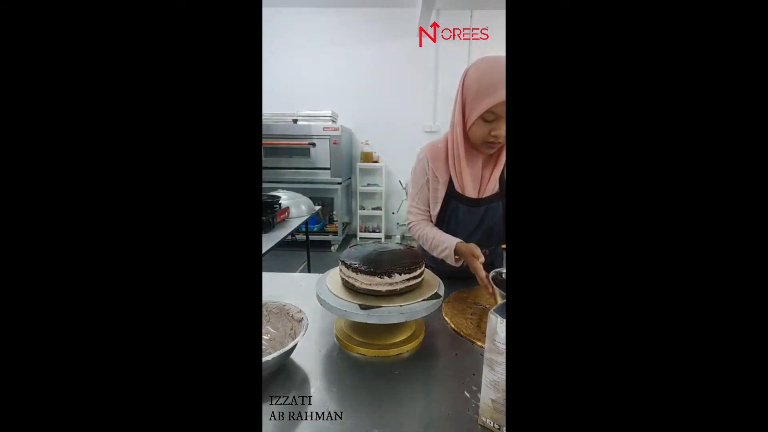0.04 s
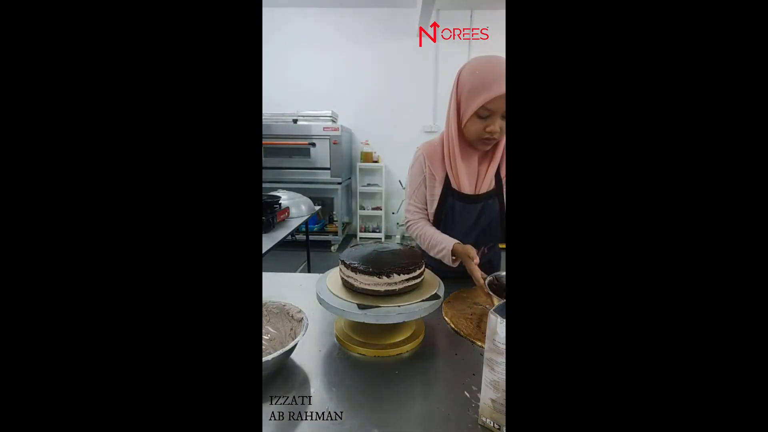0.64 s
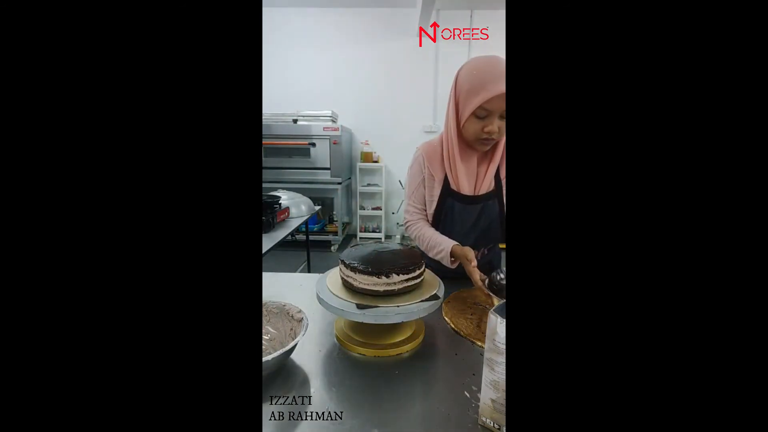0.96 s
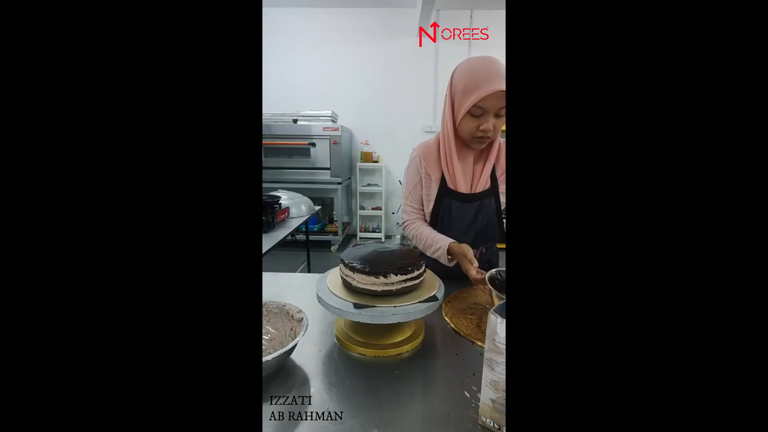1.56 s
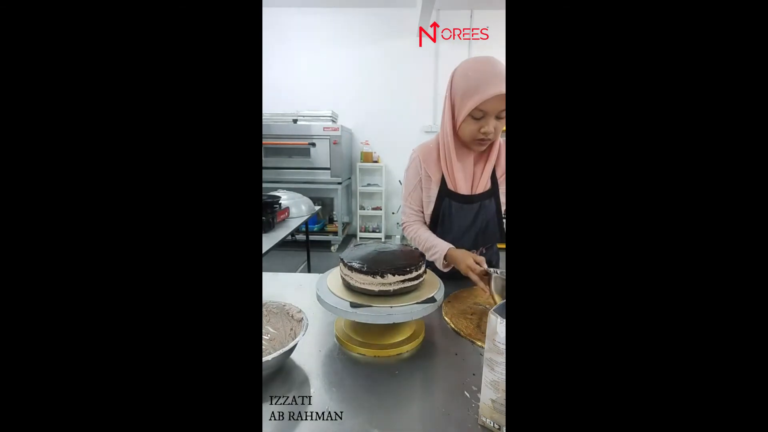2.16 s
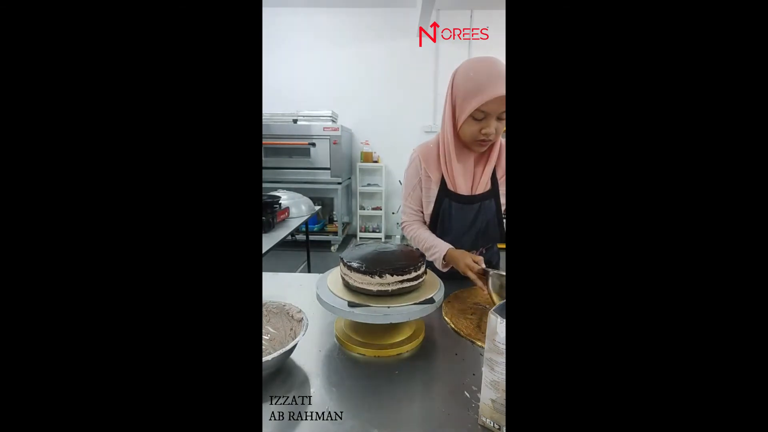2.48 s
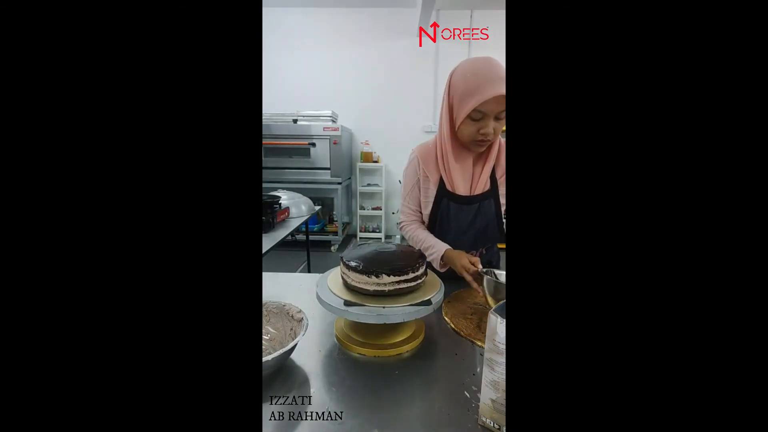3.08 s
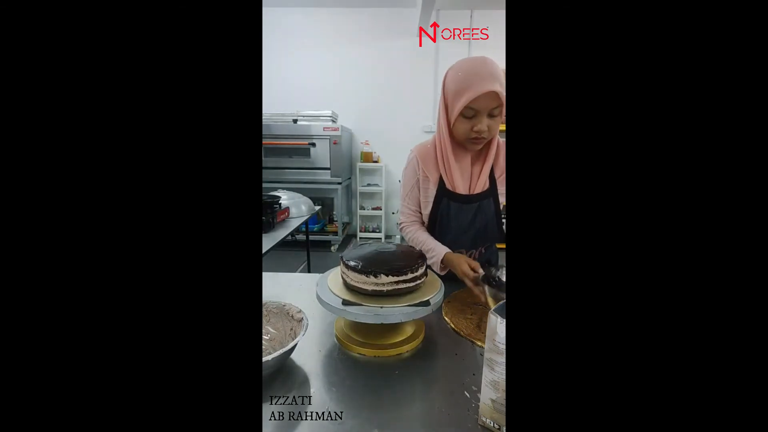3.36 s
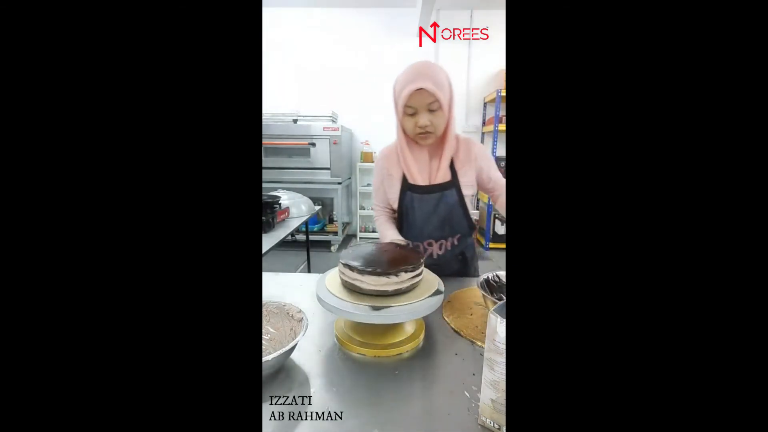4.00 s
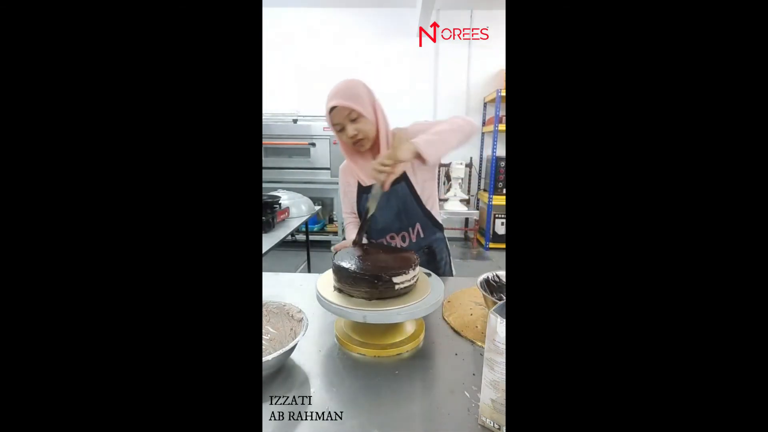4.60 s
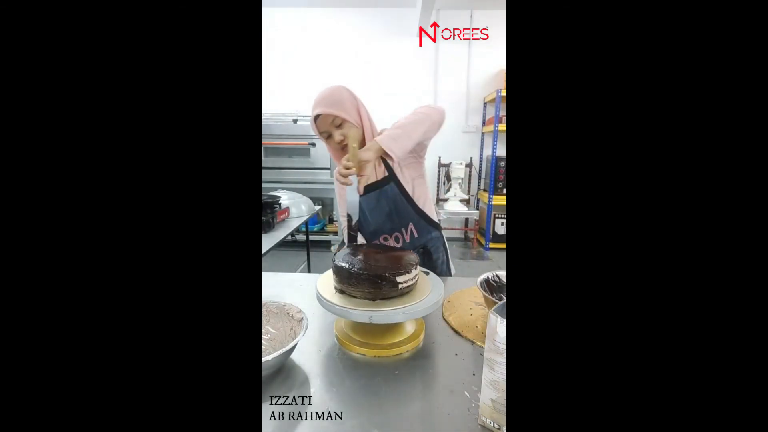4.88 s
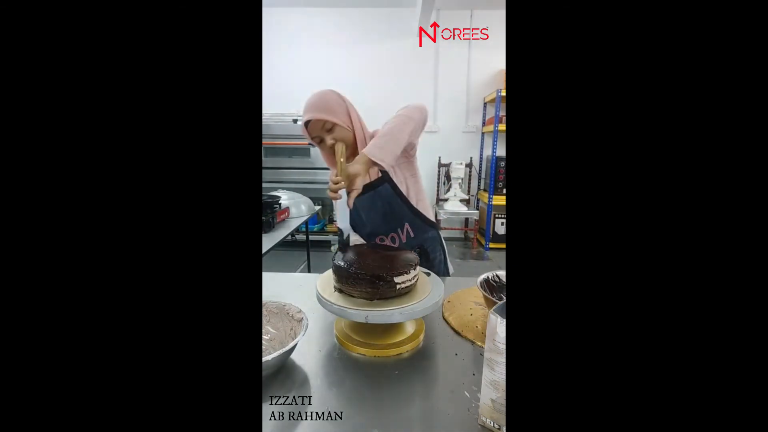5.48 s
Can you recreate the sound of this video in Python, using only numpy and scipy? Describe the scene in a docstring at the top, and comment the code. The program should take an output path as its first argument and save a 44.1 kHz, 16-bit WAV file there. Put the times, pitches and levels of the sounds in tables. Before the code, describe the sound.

Irregular metal taps, dull bowl knocks and soft scrapes ring through a humming kitchen, followed by one booming thump on a counter.

```python
"""Kitchen machines hum and rush, and a soft hiss swells into the first tap of a metal utensil.
It clinks on steel bowls, waking the modes of their thin metal, knocks dully on a filled one
and scrapes softly between the taps. Something is put down with a thump that makes the counter boom,
and faint rubs at a cake stand follow. The hard-walled room rings long after every blow."""
import sys
import numpy as np
from scipy import signal
from scipy.fft import rfft, irfft
from scipy.io import wavfile
from scipy.ndimage import uniform_filter1d

SR = 44100
rng = np.random.default_rng(int(sys.argv[2]) if len(sys.argv) > 2 else 0)


def transcribe(signal):
    """Save signal, clipped to [-1, 1], as a 16-bit WAV file at the path in sys.argv[1]."""
    frames = np.atleast_2d(signal).T
    limited = np.clip(frames, -1, 1)
    pcm = np.round(limited * 32767).astype(np.int16)
    wavfile.write(sys.argv[1], SR, pcm)


N = 249165
HZ = np.fft.rfftfreq(8192, 1 / SR)  # frequency grid for every body's response


def amp(db):
    """Decibels to gain."""
    return 10 ** (np.asarray(db) / 20)


def unit_rms(x):
    """Scales to an rms of one."""
    return x / np.sqrt(np.mean(x ** 2) + 1e-20)


def curve(points, hz):
    """Reads a breakpoint curve on a log-frequency axis."""
    f, value = np.transpose(points)
    return np.interp(np.log(hz + 1), np.log(f + 1), value)


def add(mix, s, sound):
    """Mixes a stereo sound in at time s."""
    part = mix[:, round(s * SR):][:, :sound.shape[1]]
    part += sound[:, :part.shape[1]]


def impulse(gain):
    """The minimum-phase impulse response of a body with this gain at HZ."""
    cepstrum = irfft(np.log(np.maximum(gain, 1e-5)))
    half = len(cepstrum) // 2
    folded = np.r_[cepstrum[0], 2 * cepstrum[1:half], np.zeros(half)]
    return irfft(np.exp(rfft(folded)))[:half]


def filtered(track, gain):
    """Plays a stereo track through a body with this gain at HZ."""
    return signal.oaconvolve(track, impulse(gain)[None], axes=1)[:, :N]


def bell(hz, width):
    """One resonance as a bell curve of height one."""
    return 1 / (1 + (2 * (HZ - hz) / width) ** 2)


def mode_eq(modes):
    """The boosts and cuts of a set of bell curves, in dB."""
    return sum(db * bell(hz, width) for hz, width, db in modes)


def steel_ripple(depth_db, smooth_bins):
    """Each spot wakes its own mix of sheet steel's close modes (dB); fewer bins ring longer."""
    noise = rng.standard_normal(len(HZ))
    close = uniform_filter1d(uniform_filter1d(noise, smooth_bins), smooth_bins)
    ripple = unit_rms(close - uniform_filter1d(close, 4 * smooth_bins))
    return depth_db * (ripple - np.maximum(ripple - .6, 0) / 2 - .23)  # deep gaps, rounded tops


# stereo image of the room: f/Hz, left-right correlation
CORRELATION = [(50, 0.8), (130, 0.99), (250, 0.83), (500, 0.59), (1000, 0), (2000, 0.044), (15000, 0)]


def diffuse(size, spectrum=None):
    """Noise from all around: nearly mono in the bass, wide in the treble."""
    hz = np.fft.rfftfreq(size, 1 / SR)
    left, unrelated = np.exp(2j * np.pi * rng.random((2, len(hz))))
    alike = np.clip(curve(CORRELATION, hz), -1, 1)
    right = alike * left + np.sqrt(1 - alike ** 2) * unrelated
    gain = amp(curve(spectrum, hz)) if spectrum else 1
    return unit_rms(irfft(np.array([left, right]) * gain, size))


# spectrum of the fans: f/Hz, relative level/dB
FAN_RUSH = [(25, -18), (75, -15), (100, -9), (130, -7), (190, 0), (270, -9), (350, -4.5), (490, -11),
            (800, -10.5), (1600, -19), (2700, -26), (5000, -41), (8000, -40), (15000, -35.5)]
# tones of the motors: f/Hz, level/dB
MOTOR_HUM = [(101, -72), (115, -72.5), (200, -76), (246.5, -65), (345, -67), (432, -77)]


def machines(rush_db=-54, waver_rad=0.41, gust_db=4.5, smooth_above_hz=900):
    """The bed: fans rush unevenly and motors hum with slowly wavering tones."""
    t, knots = np.arange(N) / SR, np.linspace(0, N / SR, num=30)
    hum = 0
    for hz, db in MOTOR_HUM:
        drift = waver_rad * np.interp(t, knots, rng.standard_normal(len(knots)))
        hum += amp(db) * np.sqrt(2) * np.sin(2 * np.pi * hz * t + drift)
    hz, _, bands = signal.stft(diffuse(N, FAN_RUSH), SR, nperseg=2048)
    gusts = uniform_filter1d(rng.standard_normal(bands.shape[1:]), size=7, axis=0)
    gusts = unit_rms(uniform_filter1d(gusts, size=6, axis=1))
    depth_db = gust_db / np.hypot(1, hz / smooth_above_hz)  # the hiss is smoother than the rumble
    rush = unit_rms(signal.istft(bands * amp(depth_db[:, None] * gusts))[1][:, :N])
    return (amp(rush_db) * rush + hum) * amp([[-.7], [.7]])


# soft hiss swelling into the first tap, then scrapes: peak t/s, swell/s, fade/s, level/dB, rasp/dB
SWELLS = [(0.187, 0.09, 0.11, -58.5, 8), (1.04, 0.088, 0.097, -49.5, -10), (1.191, 0.064, 0.067, -53, 3.5),
          (1.946, 0.059, 0.078, -51, 6.5), (3.53, 0.12, 0.069, -54.5, 1.5), (4.2, 0.11, 0.12, -66, -18),
          (5.35, 0.092, 0.39, -75, -3)]
# tone of the scraping hiss, lifted near 9.6 kHz where the rest of the scene is already dulled: f/Hz, relative
# level/dB
SCRAPE_EQ = [(300, -27), (700, 0), (1800, 5.5), (3000, -4), (4500, 3), (6000, 3.5), (7700, 9), (8900, -0.5),
             (9600, 5.5), (11000, -3.5), (15000, -11)]


def scraping(grit=0.37, catches_per_s=260, rasp_below_hz=5500):
    """Gritty hiss swells and fades: a lead-in to the first tap, then light friction along the bowl, and last a
    soft spatula stroke over the cake's icing."""
    t, out = np.arange(N) / SR, np.zeros((2, N))
    catches = unit_rms((rng.random(N) < catches_per_s / SR) * rng.exponential(1, N))
    hiss = rng.standard_normal((2, N)) + grit * catches
    for peak, swell_s, fade_s, db, rasp_db in SWELLS:
        rasp = rasp_db / (1 + (HZ / rasp_below_hz) ** 6)
        colour = curve(SCRAPE_EQ, HZ) + rasp + steel_ripple(depth_db=4.5, smooth_bins=14)
        envelope = np.exp(-abs(t - peak) / np.where(t < peak, swell_s, fade_s))
        out += amp(db) * envelope * unit_rms(filtered(hiss, amp(colour)))
    return out


# reverb decay of the kitchen: f/Hz, t60/s
ROOM_DECAY = [(70, 1), (150, 1), (300, 0.41), (660, 0.7), (1500, 0.49), (3000, 0.64), (5000, 0.48),
              (8000, 0.46), (14000, 0.24)]
# slaps off its walls: delay/s, relative level/dB
WALL_ECHOES = [(.017, -25), (.041, -24), (.049, -14), (.056, -38), (.098, -16), (.17, -14.5), (.245, -18.5)]


def kitchen(blow, direct_db, lag_s, scatter, hold_s, walls_db, build_s=0.0094, scatter_s=0.0065):
    """Direct sound, a spray of echoes off counter and bowls, wall slaps, a tail that holds, then dies."""
    hz, frame_s, bands = signal.stft(diffuse(SR), SR, nperseg=256)
    decay = amp(-60 * (np.hypot(frame_s, hold_s) - hold_s) / curve(ROOM_DECAY, hz)[:, None])
    tail = signal.istft(bands * decay, SR)[1][:, :SR]
    t = np.arange(SR) / SR
    tail = unit_rms(tail * (1 - np.exp(-t / build_s))) / np.sqrt(SR)
    spray = unit_rms(rng.standard_normal((2, SR)) * np.exp(-(t / scatter_s) ** 2)) / np.sqrt(SR)
    direct = np.zeros((2, SR))
    far_side = int(lag_s > 0)  # a positive lag reaches the left first
    direct[1 - far_side, 0] = 1
    direct[far_side, round(abs(lag_s) * SR)] = 1
    for delay, db in WALL_ECHOES:
        add(tail, delay, amp(db + walls_db) * direct)
    # long waves pass the clutter whole, short ones are scattered by it
    straight = signal.lfilter(*signal.butter(1, 3500, fs=SR), direct)
    scattered = signal.lfilter(*signal.butter(1, 3500, "high", fs=SR), spray)
    near = straight + scatter * scattered
    return signal.fftconvolve(blow[None], amp(direct_db) * near + tail, axes=1)


# hits on the filled bowl: t/s, level/dB, pitch factor, clack/dB, direct/dB
KNOCKS = [(0.2135, 7.5, 1.03, -21, -17), (0.61, -2, 0.87, -32, -2), (0.6315, 12, 1, -36, -7.5),
          (0.682, -3.5, 0.93, -10, 8), (0.6942, 0.5, 1.04, -14, 5.5), (1.5144, 20, 1.03, -16.5, 1),
          (2.5052, 17, 0.97, -1.5, 0), (3.1633, 25.5, 1.016, -25.5, 3.5)]
# modes of its damped wall: f/Hz, width/Hz, level/dB
DAMPED_MODES = [(622, 56, 1), (686, 46, 3), (850, 150, -6.5), (1040, 120, -16)]
# clack of hard contact: f/Hz, width/Hz
CLACK_BAND = (1730, 570)


def knock(level_db, pitch, clack_db, direct_db, snap_db=-16):
    """The filling damps the bowl's wall quickly; a brief snap comes straight from the contact point."""
    wall = np.sqrt(sum(amp(db) ** 2 * bell(hz * pitch, width) for hz, width, db in DAMPED_MODES))
    clack_hz, clack_width = CLACK_BAND
    clack = amp(clack_db) / np.hypot(1, (2 * (HZ - clack_hz) / clack_width) ** 2)
    # too small for bass, too soft for treble
    radiated = 1 / np.hypot(1, (500 / (HZ + 1)) ** 6) / np.hypot(1, HZ / 2600)
    blow = amp(level_db) * impulse(np.hypot(wall, clack) * radiated)
    sound = kitchen(blow, direct_db, lag_s=0.00016, scatter=0.15, hold_s=0.18, walls_db=-1,
                    build_s=0.0009)
    snap_hz, snap_width = 1150, 900
    snap_band = 1 / np.hypot(1, (2 * (HZ - snap_hz) / snap_width) ** 2)
    snap = amp(level_db + snap_db) * impulse(radiated * snap_band)
    add(sound, 0, np.array([snap, np.roll(snap, shift=6)]))
    return sound * amp([[.8], [-.8]])


# utensil hits on steel: t/s, level/dB, heft/dB, top treble/dB, direct/dB, scatter gain, part struck
CLINKS = [(0.2136, -1.5, -6, -1, -8.5, 2.3, "rim"), (0.6314, 0, 6, -3, -16, 2.8, "wall"),
          (0.64, -18, 2, -3, 0, 2.2, "wall"), (0.6938, -22, 10.5, 2, 4, 1.1, "wall"),
          (1.287, -27.5, 8, -8, -6, 1.4, "wall"), (1.4494, 0.06, 5.5, 2.5, -9, 1.2, "wall"),
          (2.475, -9.5, 8.5, 6, -7.5, 0.49, "wall"), (2.5058, -1, 8.5, -4, -11.5, 1, "wall"),
          (3.0267, 2.5, 9, -12, -1, 0.61, "base"), (3.8409, 1, 1, 2, -6.5, 0.98, "blade")]
# tone of a light tap: f/Hz, level/dB
TAP_EQ = [(60, -28), (290, -17.5), (400, 0), (650, 0.5), (1000, -5), (1550, 0.5), (2800, -1.5),
          (4700, -4.5), (5600, -3), (6400, -1.5), (7700, 4.5), (8700, -4.5), (11000, -8.5)]
# resonances of the bowl's rim, wall and base and of the utensil's blade: f/Hz, width/Hz, boost/dB
STEEL_MODES = {"rim": [(1103, 170, 16), (1512, 89, 0), (1754, 430, 7.5), (1901, 47, 3), (2270, 110, 3.5),
               (2680, 490, 22.5), (3000, 51, 12.5), (3560, 530, 20.0), (4380, 200, 11.5), (4830, 120, 17.5),
               (5200, 51, -6), (5339, 63, 10), (5450, 41, 5.9), (5740, 110, 8), (5990, 190, 13),
               (6570, 101, 14), (6930, 115, 5), (7300, 50, 4), (7620, 483, 17.5), (8400, 790, 7.5)],
               "wall": [(1092, 150, 8.5), (1296, 73, 9.5), (1790, 85, 6.5), (2050, 78, 5), (2650, 140, 5.5),
               (2960, 22, 12.5), (3570, 42, 6.5), (4270, 250, 7), (5064, 610, 3.1), (5860, 67, 5),
               (6420, 79, 9), (7160, 86, 6), (7470, 410, 4), (8370, 170, 4), (8600, 284, 5)],
               "base": [(333, 29, 4), (1035, 250, 14), (1530, 130, 4), (1991, 43, 5), (2370, 120, 6),
               (2760, 230, 8), (3270, 340, 9), (3760, 493, 7.5), (4440, 43, 11), (4870, 51, 17),
               (5170, 270, 18.5), (5260, 80, 13), (6390, 199, 22), (7200, 650, 7), (8740, 630, 6.5)],
               "blade": [(1140, 49, 6), (1406, 460, 15.5), (1730, 120, 13), (2293, 390, 5.6),
               (2693, 260, 15), (3356, 220, 4.4), (3780, 330, 6.5), (4030, 40, 4.2), (5180, 660, 12),
               (6151, 287, 9.5), (7600, 210, 7), (8160, 580, 8.5), (8600, 71, 10)]}
# deep gaps between each tap's ringing partials, by part: f/Hz, width/Hz, gain/dB
GAPS = {"rim": [(1410, 61, -20), (2580, 79, -22), (2745, 100, -12.5), (3120, 290, -21), (3520, 85, -13),
        (3690, 133, -17.7), (4140, 161, -7), (4620, 244, -16), (7544, 230, -23), (8080, 410, -13.5)],
        "wall": [(1220, 67, -7.0), (1750, 640, -5.5), (2180, 51, -4), (4280, 40, -12), (5520, 330, -2)],
        "base": [(668, 61, -15), (1020, 150, -16.6), (1760, 71, -11.0), (2968, 110, -6), (3320, 120, -17.5),
        (5200, 490, -21), (6430, 320, -15), (7000, 82, -12.2)], "blade": [(1710, 166, -16), (1920, 97, 0),
        (4686, 40, -7.5), (5320, 500, -8.5), (5669, 58, -8)]}
# lightly damped partials, by part: f/Hz, level/dB, t60/s
RING_PARTIALS = {"rim": [(2645, -59, 0.55), (2685, -61, 0.5), (3400, -60, 0.45), (3580, -60, 0.45),
                 (4360, -63, 0.45), (4880, -62, 0.45), (5480, -64, 0.45), (5780, -62, 0.45),
                 (6820, -60, 0.45)], "wall": [(2673, -61, 0.7), (2810, -60, 0.7), (2988, -57, 0.7),
                 (7574, -61, 0.5), (7662, -62, 0.5)], "base": [(2810, -62, 0.55)],
                 "blade": [(2640, -60, 0.85), (2700, -60, 0.85), (7660, -55, 0.55)]}
# how long the reverb holds up, by part: hold/s
REVERB_HOLD = {"rim": 0.19, "wall": 0.2, "base": 0.16, "blade": 0.14}


def clink(level_db, heft_db, top_db, direct_db, scatter, part):
    """Metal on metal: heft drives the low modes, hard contact the top treble; a few partials sing on."""
    low_shelf = 1 / (1 + (HZ / 3720) ** 4)
    top_shelf = 1 - 1 / (1 + (HZ / 10700) ** 20)
    contact = curve(TAP_EQ, HZ) + heft_db * low_shelf + top_db * top_shelf
    modes = mode_eq(STEEL_MODES[part] + GAPS[part]) + steel_ripple(depth_db=2.7, smooth_bins=9)
    blow = impulse(amp(level_db + contact + modes))
    travel_s = 0.000478  # of a 1 kHz bending wave through the steel; higher ones arrive sooner
    dispersion = np.exp(-4j * np.pi * travel_s * np.sqrt(1000 * HZ))
    blow = irfft(rfft(blow, 2 * len(blow)) * dispersion)[:len(blow)]
    sound = kitchen(blow, direct_db, lag_s=-.0001, scatter=scatter, hold_s=REVERB_HOLD[part],
                    walls_db=-19, scatter_s=0.0045)
    t = np.arange(sound.shape[1]) / SR
    ring = sum(amp(db - 60 * t / t60) * np.sin(2 * np.pi * hz * t + rng.uniform(-1.4, 1, (2, 1)))
               for hz, db, t60 in RING_PARTIALS[part])
    return (sound + amp(level_db) * ring) * amp([[-.9], [.9]])


# something put down on the counter: t/s, blow level/dB, direct/dB
THUMP = (4.4634, 9, -6.5)
# tone of the counter: f/Hz, level/dB
COUNTER_EQ = [(25, -33), (50, -23), (75, 1), (118, 6), (150, 4), (250, 4), (450, -5), (760, 0.5),
              (1100, -7.5), (2500, -24), (5000, -29), (8000, -22), (15000, -41)]
# ring of its steel top: f/Hz, width/Hz, gain/dB
COUNTER_RING = [(408, 120, 7.5), (736, 120, 5.5), (940, 51, -7), (1720, 190, 3.5), (2360, 610, 10.5),
                (2990, 91, 11), (3700, 270, 3), (4370, 150, 15), (5000, 170, 10), (5950, 120, 4)]
# its booming low modes: f/Hz, level/dB, t60/s
COUNTER_BOOM = [(68.1, -43, 1.0), (101.5, -36, 0.6), (114.8, -32, 0.6)]


def thump(blow_db, direct_db, attack_s=0.016):
    """The broad counter top booms under a soft blow."""
    t = np.arange(SR) / SR
    boom = sum(amp(db - 60 * t / t60) * np.sin(2 * np.pi * hz * t) for hz, db, t60 in COUNTER_BOOM)
    boom *= 1 - np.exp(-t / attack_s)
    blow = amp(blow_db) * impulse(amp(curve(COUNTER_EQ, HZ) + mode_eq(COUNTER_RING)))
    impact = kitchen(blow, direct_db, lag_s=-.00005, scatter=0.64, hold_s=0.059, walls_db=-20)
    return boom - impact[:, :SR]


# rubs at the cake stand: t/s, level/dB
RUBS = [(5.06, -57), (5.27, -73), (5.62, -60.5)]
# their resonance: f/Hz, width/Hz
RUB_BAND = (870, 250)


def rubbing(fade_s=0.032):
    """Faint, dull rubs as the cake is worked on: noise in one midrange resonance swells and fades."""
    t = np.arange(N) / SR
    rub = unit_rms(filtered(diffuse(N), bell(*RUB_BAND)))
    return rub * sum(amp(db) * np.exp(-((t - s) / fade_s) ** 2) for s, db in RUBS)


def scene():
    """All hits over the bed of machines, scrapes and rubs."""
    mix = machines() + scraping() + rubbing()
    for s, *hit in CLINKS:
        add(mix, s, clink(*hit))
    for s, *hit in KNOCKS:
        add(mix, s, knock(*hit))
    add(mix, THUMP[0], thump(*THUMP[1:]))
    return mix


# response of a small microphone: f/Hz, gain/dB
MIC_EQ = [(20, -1), (8400, -2), (9100, -2.5), (9700, -16), (10300, -18.5), (15500, -16.5)]


def record(dry, hiss_db=-91, cutoff_hz=15550):
    """A small microphone dulls the top treble and adds faint hiss; a steep low-pass ends the band."""
    heard = filtered(dry, amp(curve(MIC_EQ, HZ))) + amp(hiss_db) * rng.standard_normal((2, N))
    low_pass = signal.firwin(511, cutoff_hz, window=("kaiser", 9), fs=SR)
    return signal.oaconvolve(heard, low_pass[None], "same")


dry = scene()
out = record(dry)
transcribe(out)
```